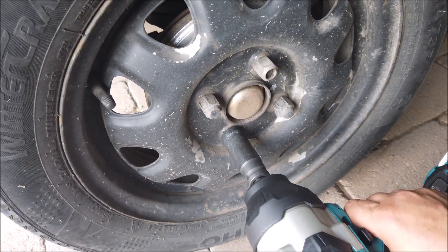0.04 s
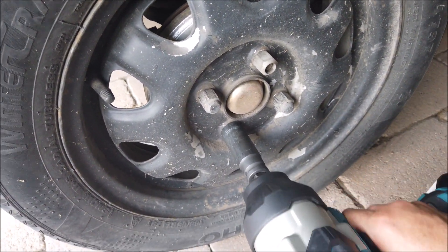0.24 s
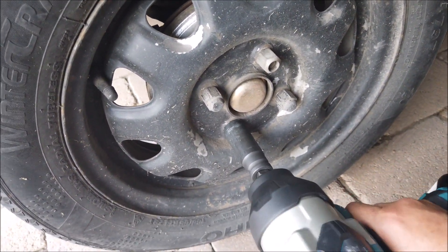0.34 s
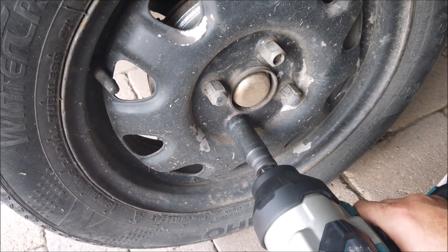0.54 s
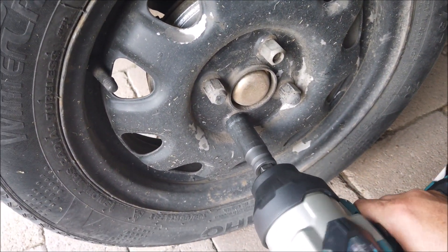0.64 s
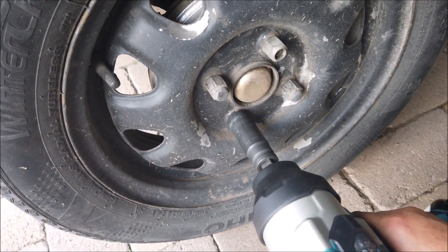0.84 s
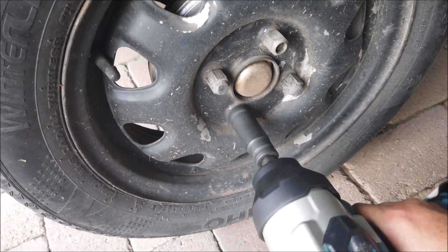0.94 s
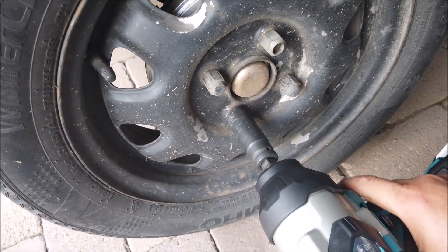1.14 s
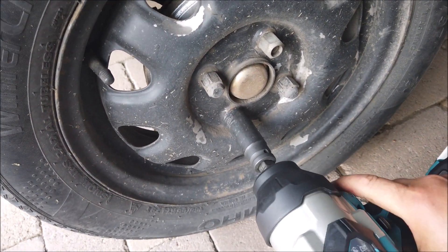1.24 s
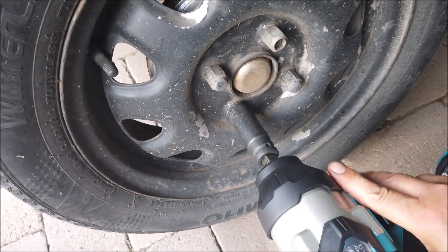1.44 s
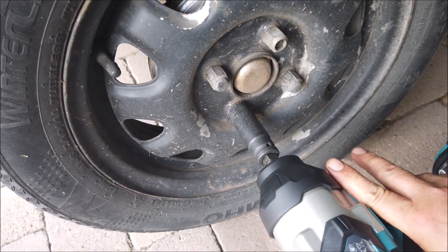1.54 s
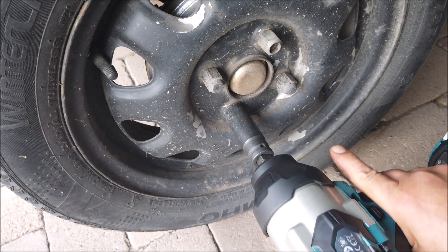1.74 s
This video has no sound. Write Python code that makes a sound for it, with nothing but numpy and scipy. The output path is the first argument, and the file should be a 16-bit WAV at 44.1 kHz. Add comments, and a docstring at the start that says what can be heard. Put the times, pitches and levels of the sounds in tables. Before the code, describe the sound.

A cordless impact wrench hammers a wheel nut in two short, loud, clattering bursts, then clicks

```python
"""Two short bursts of an impact wrench loosening a wheel nut, close by on a paved yard.
In each, noisy gears whirr and hiss, hammer blows clang and crack, and the nut grinds in its steel wheel.
The blows and the grinding make the wheel ring and shake; a faint hum stays on after the second burst.
Small clicks and soft rustles of the hand on the tool come at both ends, over a low outdoor rumble.
Random tooth contacts and noise are coloured, shaped in time and fed to ringing modes."""
import sys
import numpy as np
from scipy import signal
from scipy.fft import rfft, irfft
from scipy.io import wavfile

SR = 44100
rng = np.random.default_rng(int(sys.argv[2]) if len(sys.argv) > 2 else 0)


def generate_wav(signal):
    """Clip the signal to [-1, 1] and save it as 16-bit WAV at the path in sys.argv[1]."""
    frames = np.transpose(np.atleast_2d(signal))
    scaled = np.clip(frames, -1, 1) * 32767
    pcm = np.round(scaled).astype(np.int16)
    wavfile.write(sys.argv[1], SR, pcm)


N = 79380  # length in samples
T = np.arange(N) / SR  # time of each sample, s
HZ = np.maximum(np.fft.rfftfreq(N, 1 / SR), 1)  # frequency of each spectrum bin

# Hammer blows: (time [s], clang level [dB], clang pitch [Hz], crack level [dB],
# thud level [dB], thud pitch [Hz], length [s])
HAMMER_BLOWS = [(.257, -27, 2150, -22.5, -43, 388.6, 0.0034), (0.281, -21.5, 3490, -48, -35.5, 574, 0.0011),
                (.291, -28, 3600, -26, -31, 250, 0.0032), (0.3204, -27.5, 2560, -42, -47, 432.3, 0.003),
                (0.328, -31, 3050, -34, -39, 220, 0.0012), (0.334, -31, 2300, -33.5, -38, 382.3, 0.0062),
                (.365, -38, 2100, -33.5, -32, 880, 0.0027), (0.381, -29.5, 2810, -37, -40.5, 280, 0.0034),
                (0.394, -34, 3700, -48, -36.5, 440, 0.0028), (0.403, -29, 3460, -49, -40, 390, 0.0025),
                (0.4277, -31, 3460, -29.5, -44, 417, .003),
                (0.4355, -17.5, 3560, -25.5, -38.5, 430, 0.0025),
                (0.4652, -33, 2680, -41, -42.5, 740, 0.0022), (0.4683, -37.5, 2160, -38, -29, 660, 0.003),
                (.493, -31, 2640, -39, -35, 236.3, .004), (0.5019, -34, 2100, -36.5, -33, 199.3, 0.0051),
                (0.8048, -27.5, 3700, -34.5, -49.5, 392, 0.0013),
                (0.8181, -22, 3530, -22, -38.5, 320, 0.0018), (.8295, -32.5, 2950, -23.5, -45, 420, 0.0043),
                (0.857, -27.5, 3260, -40, -40, 246, .005), (0.863, -25.5, 2700, -44.5, -40.5, 360, .003),
                (0.895, -26.5, 3550, -26, -35, 281.3, 0.0054),
                (0.9266, -25.5, 3380, -38, -36.5, 258.7, 0.0049),
                (0.9679, -17, 3130, -25.5, -35.5, 423.5, 0.0022),
                (1.0037, -25.5, 2980, -25, -39, 440, 0.0019), (1.036, -23, 3050, -42.5, -50, 493.5, 0.0018),
                (1.0672, -32, 3020, -30.5, -53.5, 390, 0.0033),
                (1.0937, -27.5, 2600, -31, -50, 459, 0.0033), (1.1137, -30, 2590, -43, -57.5, 430, 0.0053),
                (1.177, -34, 3070, -39.5, -52.5, 369, 0.0056), (1.2441, -39, 2900, -40, -58.5, 685, 0.0048)]
# Ringing modes of the tool's housing and socket: (pitch [Hz], relative level [dB], time to fall 60 dB [s])
HOUSING_MODES = [(2258, -11, 0.077), (2680, -7.5, .06), (2650, -5.5, .07), (2780, 1.5, .09),
                 (3060, -0.5, 0.13), (3050, -2.5, .06), (3460, 3.5, 0.043), (3530, 4.5, .07),
                 (3680, -1, .07), (3980, -10.5, 0.11), (3930, -5.5, 0.24), (4690, -10.5, .04),
                 (6760, -12.5, 0.023), (10570, -14.5, .012)]


def from_db(db):
    """Turn decibels into a gain."""
    return 10 ** (np.asarray(db) / 20)


def rms_one(x):
    """Scale a signal to an average strength (rms) of 1."""
    return x / np.sqrt(np.mean(x ** 2) + 1e-20)


def colour(points):
    """Gain at every frequency, drawn through (frequency [Hz], level [dB]) points."""
    hz, db = np.transpose(points)
    return from_db(np.interp(np.log(HZ), np.log(hz), db))


def resonance(hz, width_hz):
    """Gain of one resonance, strongest at its own pitch."""
    detuning = (HZ ** 2 - hz ** 2) / (HZ * width_hz)
    return 1 / np.sqrt(1 + detuning ** 2)


def level(s, db):
    """Gain over time: a 10 ms rise up to the first point, the curve, then a steady fade."""
    fade_db_per_s = 299.5
    faded_db = np.interp(T, s, db) - fade_db_per_s * np.maximum(T - s[-1], 0)
    rise = np.clip(1 + (T - s[0]) / .01, 0, 1)
    return from_db(faded_db) * rise


def flutter(rate_hz):
    """Slow random wandering, made by smoothing noise; rms 1."""
    spectrum = rfft(rng.standard_normal(N)) / (1 + (HZ / rate_hz) ** 2)
    return rms_one(irfft(spectrum, N))


def unevenness(rate_hz, depth_db):
    """A randomly fluttering gain with rms 1."""
    return rms_one(from_db(depth_db * flutter(rate_hz)))


def noise():
    """Two unrelated white noises."""
    return rng.standard_normal((2, N))


def contacts(per_s, spread_db):
    """Two trains of tiny metal contacts, random in time, size and sign."""
    sizes = from_db(spread_db * np.minimum(rng.exponential(1, (2, N)), 4))
    signed = sizes * rng.choice([-1, 1], (2, N))
    return signed * (rng.random((2, N)) < per_s / SR)


def stereo(pair, gain, width=None):
    """Colour two signals and use them as the middle and the left-right difference; rms 1."""
    # Width of the tool's sound: (frequency [Hz], side level minus middle level [dB])
    tool_width = [(60, -8), (450, -6.5), (1050, -2.5), (1400, -7.5), (1700, -1), (2100, -7), (2700, -5.5),
                  (3200, -11), (3900, -5), (5100, 0.5), (6500, -1.5), (9200, -3), (11000, -.5), (15000, 1)]
    side_gain = colour(tool_width if width is None else width)
    mid, side = irfft(rfft(pair) * gain * [np.ones(len(HZ)), side_gain], N)
    return rms_one(np.array([mid + side, mid - side]))


def envelope(s, attack_s, length_s, t60):
    """Rise from s, hold until s + length_s, then fall 60 dB in every t60 seconds."""
    rise = np.clip((T - s) / attack_s, 0, 1)
    return rise * from_db(-60 * np.clip((T - s - length_s) / t60, 0, 3))


def strike(sound, s, db, length_s, t60):
    """Cut a short stroke out of a sound and set its level, whatever the chance strength of that piece."""
    shape = envelope(s, .0004, length_s, t60)
    stroke = shape * sound
    return from_db(db) * stroke / np.sqrt(np.mean(stroke ** 2) / np.mean(shape ** 2))


def ring(x, modes):
    """Let x set resonant modes ringing; the sum is as strong (rms) as x."""
    out = 0
    for hz, db, t60 in modes:
        decay = from_db(-60 / (t60 * SR))  # loss per sample
        turn = 2 * np.pi * hz / SR  # phase step per sample
        feedback = [1, -2 * decay * np.cos(turn), decay * decay]
        mode = signal.lfilter([1, 0, -1], feedback, x + 1e-18)
        out = out + from_db(db) * rms_one(mode)
    return rms_one(out) * np.sqrt(np.mean(x ** 2))


def drive():
    """Gear teeth rattle in the housing: a whirr near 3 kHz and a hiss above, uneven as the socket wobbles."""
    # The drive, one list for each burst: (time [s], gear whirr level [dB], treble hiss level [dB])
    drive_bursts = [
        [(.205, -71, -70), (.215, -67, -62), (.223, -35, -53), (.25, -42, -39), (.263, -30, -32.5),
         (.355, -39.5, -39.5), (.42, -32, -31.5), (.485, -37, -37.5), (.548, -31.5, -33), (.58, -45.5, -44),
         (.64, -56, -57), (.745, -73, -77)],
        [(.755, -71.5, -72.5), (.768, -63, -61), (.779, -34.5, -50.5), (.812, -31.5, -42.5), (.832, -33, -29),
         (.885, -36, -39), (.955, -31, -29), (1.06, -31, -33), (1.12, -31.5, -33), (1.145, -32, -36),
         (1.188, -34, -36), (1.226, -46, -52.5), (1.238, -47, -53.5), (1.29, -67, -73)],
    ]
    # Tone of the whirr: (frequency [Hz], level [dB per Hz])
    whirr_tone = [(300, -24), (1050, -19.5), (1450, -6), (1750, -13.5), (2100, -2.5), (2650, -1.5),
                  (3100, 0), (3600, -2), (4200, -5.5), (4700, -5.5), (5600, -18.5), (9000, -29.5),
                  (16000, -44)]
    # Tone of the hiss: (frequency [Hz], level [dB per Hz])
    hiss_tone = [(2000, -16), (4000, -8), (5800, 0), (7200, 1), (8300, -2.5), (10000, -1), (12000, -8),
                 (15500, -10.5)]

    curves = [np.transpose(burst) for burst in drive_bursts]
    whirr_level = sum(level(s, whirr_db) for s, whirr_db, _ in curves)
    whirr = whirr_level * stereo(contacts(per_s=4200, spread_db=3.5), colour(whirr_tone))
    hiss_level = sum(level(s, hiss_db) for s, _, hiss_db in curves)
    hiss = hiss_level * stereo(contacts(per_s=14000, spread_db=2.5), colour(hiss_tone))
    uneven_hiss = hiss * unevenness(rate_hz=54, depth_db=1.84)
    return (whirr + uneven_hiss) * unevenness(rate_hz=330, depth_db=0.5)


def hammer():
    """Each blow clangs at a pitch set by how anvil and socket meet, with a bright crack on top."""
    # Tone of the crack: (frequency [Hz], level [dB per Hz])
    crack_tone = [(700, -12.5), (1800, 4), (4600, 5.5), (7000, 4), (10000, 1), (12500, -2.5), (15500, -5.5)]
    crack_t60_s = .016

    crack = stereo(contacts(per_s=9800, spread_db=0.5), colour(crack_tone))
    blows = 0
    for s, clang_db, hz, crack_db, _, _, length_s in HAMMER_BLOWS:
        blows = blows + clang(s, clang_db, hz, length_s)
        blows = blows + strike(crack, s, crack_db, length_s, crack_t60_s)
    return blows


def clang(s, db, hz, length_s):
    """The jaws meet, chatter and bounce once; anvil and socket ring for a few cycles."""
    chatter_db, side_db, bounce_db = 4, -3, -3  # middle chatter, side chatter, second hit
    band_hz, ring_s = 990, 0.00054  # width of each filter pass; ringing time allowed for in the level

    during = (T >= s) & (T < s + length_s)
    hits = noise() * during * from_db([[chatter_db], [side_db]]) / np.sqrt(during.sum() + 1)
    hits[0, int(s * SR)] += 1
    hits[0, int((s + length_s) * SR)] += from_db(bounce_db)
    body = signal.butter(1, [hz - band_hz / 2, hz + band_hz / 2], "band", fs=SR, output="sos")
    # The same filter twice; the trace of noise keeps it from falling quite silent
    mid, side = signal.sosfilt(np.vstack([body, body]), hits + 1e-18 * noise())
    both = np.array([mid + side, mid - side])
    # Set the average strength over the blow and its short ring
    return from_db(db) * both * np.sqrt(2 * (length_s + ring_s) * SR / np.sum(both ** 2))


def wheel():
    """The grinding nut and the blows drive the steel wheel, which rings on; the tyre shakes a moment later."""
    # The nut grinds against the wheel: (time [s], level [dB])
    grinding = [(.21, -72), (.225, -61), (.251, -62), (.26, -35), (.355, -37.5), (.44, -37), (.515, -36),
                (.56, -40.5), (.63, -59), (.70, -69), (.765, -79), (.785, -51), (.808, -49), (.822, -36),
                (.92, -38), (1.012, -38), (1.05, -42), (1.11, -52), (1.195, -54), (1.215, -53), (1.33, -83)]
    # Tone of the grinding: (frequency [Hz], level [dB per Hz])
    scrape_tone = [(50, -14.5), (100, 3), (200, -7.5), (420, -1.5), (560, -9.5), (750, -6.5), (1050, -10),
                   (1400, -5), (2200, -5.5), (4000, -33.5), (12000, -45)]
    # Tone of the low shaking: (frequency [Hz], level [dB per Hz])
    shake_tone = [(12, -15.5), (25, -3), (38, -2.5), (70, -4), (100, -6.5), (160, -17), (400, -48.5)]
    # Modes of the steel wheel on its tyre: (pitch [Hz], relative level [dB], time to fall 60 dB [s])
    wheel_modes = [(66, 0, .55), (178, -9, .5), (204, -5, .45), (235, -4, .5), (262, -7, .45),
                   (284, -2, .45), (343, -2, .35), (395, -3, .3), (438, -1, .5), (470, -4, .35),
                   (502, -7, .25), (750, -17, .35)]
    thud_width_hz, thud_t60_s = 620, 0.022  # the width is for one pass of the resonance
    ring_db = -8  # against the knocks that drive it
    shake_db, shake_lag_s = -6, 0.066  # against the grinding curve

    s, db = np.transpose(grinding)
    scrape = stereo(contacts(per_s=1500, spread_db=2.5), colour(scrape_tone))
    knocks = level(s, db) * scrape * unevenness(rate_hz=56, depth_db=3.1)
    for at, _, _, _, thud_db, hz, length_s in HAMMER_BLOWS:
        thud = stereo(noise(), resonance(hz, thud_width_hz) ** 2)
        knocks = knocks + strike(thud, at, thud_db, length_s, thud_t60_s)
    ringing = from_db(ring_db) * ring(knocks.mean(axis=0), wheel_modes)
    shake = level(s + shake_lag_s, db + shake_db) * stereo(noise(), colour(shake_tone))
    return knocks + ringing + shake


def whines():
    """The motor sings briefly: narrow bands of noise that swell and die away."""
    # Thin whines, at start-up and at full speed:
    # (time [s], length [s], pitch [Hz], level [dB], time to fall 60 dB [s])
    motor_whines = [(0.213, .032, 8000, -49, .03), (0.512, .035, 7240, -36, .15),
                    (0.763, .022, 7780, -51, .03)]
    width_hz, attack_s = 260, .006  # the width is for one pass of the resonance

    total = 0
    for s, length_s, hz, db, t60 in motor_whines:
        tone = stereo(noise(), resonance(hz, width_hz) ** 2)
        total = total + from_db(db) * envelope(s, attack_s, length_s, t60) * tone
    return total


def hum():
    """One clean tone of the wheel, a plain sine, lingers as the second burst dies away."""
    tone = np.sqrt(2) * np.sin(2 * np.pi * 438 * T)  # 438 Hz, rms 1
    return from_db(-74.5) * tone * envelope(1.19, attack_s=.04, length_s=0.24, t60=.9)


def clicks():
    """Light clicks of the tool: its housing rings faintly and a weak, noisy room tail follows each one."""
    # Small clicks of the tool in the hand: (time [s], level [dB], dull above [Hz])
    tool_clicks = [(.1355, -68.5, 4500), (0.156, -67, 4020), (1.6609, -50, 13960), (1.676, -60.5, 5970),
                   (1.76, -73.5, 3000)]
    # Tone of a click: (frequency [Hz], level [dB per Hz])
    click_tone = [(500, -40), (900, -32), (1300, -11.5), (1700, -18), (2200, 1), (2500, -4.5), (2800, 1.5),
                  (3400, -5), (4200, -15.5), (4800, -7.5), (6500, -25), (10300, -4.5), (13000, -23),
                  (15000, -14)]
    length_s, click_t60_s = 0.0027, 0.0083
    tail_db, tail_t60_s = -13.5, 0.162  # level against the click
    ring_db = -17  # against the clicks

    direct, tails = 0, 0
    for s, db, dull_hz in tool_clicks:
        snap = stereo(noise(), colour(click_tone) / (1 + (HZ / dull_hz) ** 4))
        direct = direct + strike(snap, s, db, length_s, click_t60_s)
        tails = tails + strike(snap, s, db + tail_db, length_s, tail_t60_s)
    return direct + from_db(ring_db) * ring(direct, HOUSING_MODES) + tails


def rustles():
    """Skin slides softly over the grip: swells of noise around 3 kHz."""
    # The hand rustles on the grip: (time [s], length [s], level [dB])
    grip_rustles = [(.005, 0.036, -81), (0.129, 0.035, -78.5), (1.745, 0.014, -80)]
    swell = 0
    for s, length_s, db in grip_rustles:
        swell = swell + from_db(db) * envelope(s, .0059, length_s, t60=.2)
    return swell * stereo(noise(), resonance(2920, 2200) ** 2)


def yard(x):
    """A faint dull tail from the car body, paving and walls: x smeared by fading noise."""
    tail_db, tail_t60_s, dull_hz = -24, 0.11, 5000
    dull_noise = irfft(rfft(noise()) / np.sqrt(1 + (HZ / dull_hz) ** 4), N)
    tail = dull_noise * envelope(.004, 0.0025, .005, tail_t60_s)
    tail /= np.sqrt(np.sum(tail ** 2, axis=1, keepdims=True) * SR / 2 / dull_hz)
    return from_db(tail_db) * signal.fftconvolve(x, tail, axes=1)[:, :N]


def air():
    """A steady low outdoor rumble of coloured noise."""
    # Tone of the rumble: (frequency [Hz], level [dB per Hz])
    air_tone = [(15, -13), (27, -0.5), (37, 6.5), (50, 8), (75, -2.5), (100, -14.5), (170, -16), (300, -24),
                (600, -28.5), (1000, -33.5), (2500, -36), (5000, -45), (10000, -50), (15000, -53.5)]
    # Width of the rumble: (frequency [Hz], side level minus middle level [dB])
    air_spread = [(60, -19.5), (180, -15.5), (550, -3), (1650, -1), (15000, -2.5)]
    return from_db(-63) * stereo(noise(), colour(air_tone), air_spread)


def scene():
    """Wrench and wheel in the yard, over the outdoor rumble."""
    tool = drive() + hammer()
    housing = from_db(-15) * ring(tool, HOUSING_MODES)
    near = tool + housing + whines() + wheel() + hum() + clicks() + rustles()
    return near + yard(near) + air()


def record(dry):
    """Cut the treble steeply above 16 kHz."""
    treble_cut = signal.ellip(12, .1, 80, 16000, fs=SR, output="sos")
    return signal.sosfilt(treble_cut, dry)


dry = scene()
out = record(dry)
generate_wav(out)
```